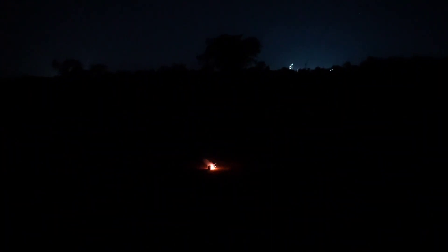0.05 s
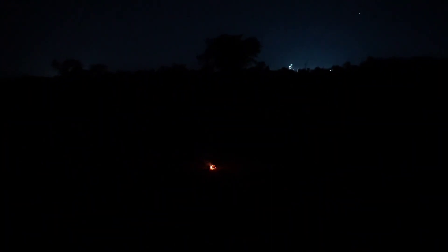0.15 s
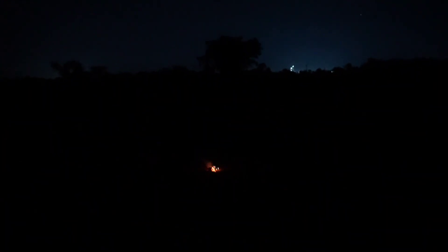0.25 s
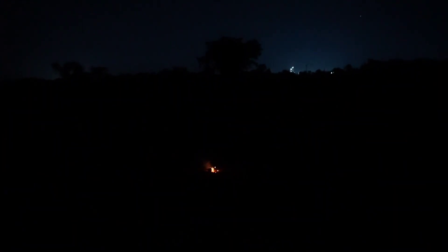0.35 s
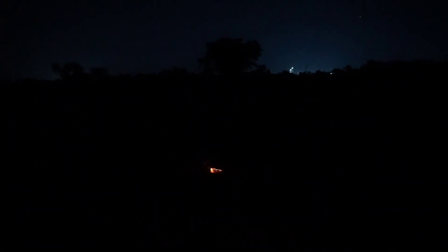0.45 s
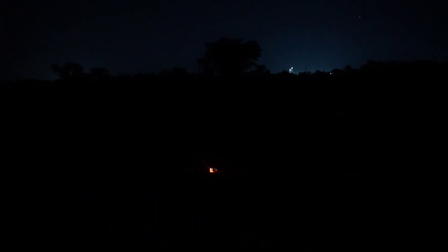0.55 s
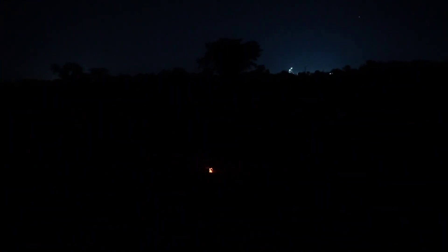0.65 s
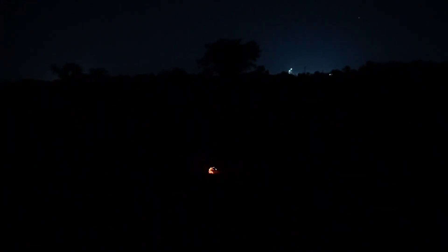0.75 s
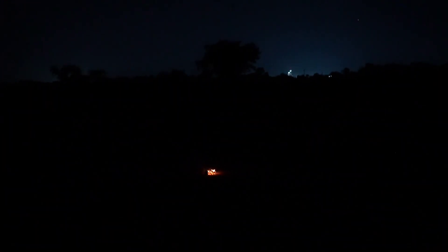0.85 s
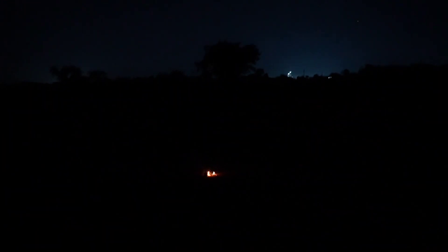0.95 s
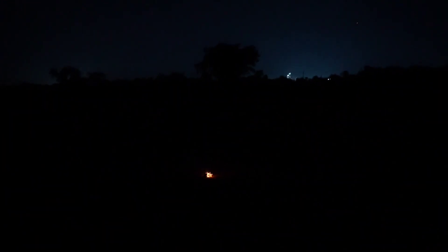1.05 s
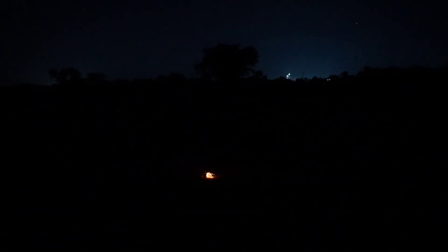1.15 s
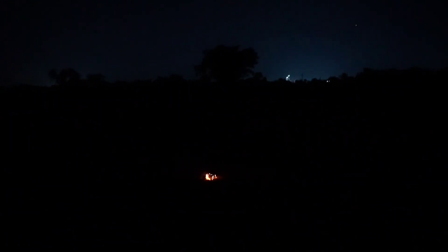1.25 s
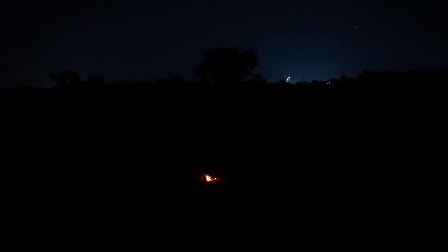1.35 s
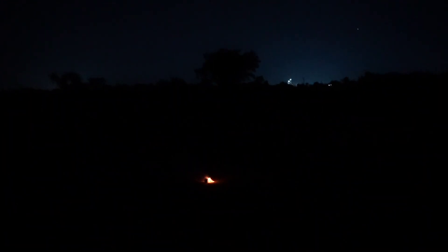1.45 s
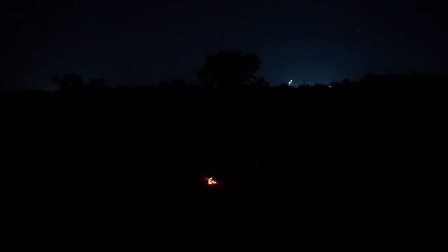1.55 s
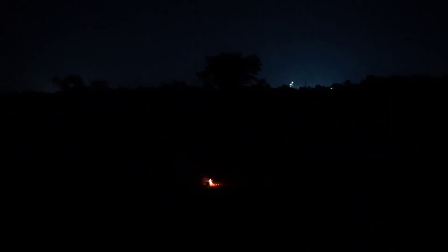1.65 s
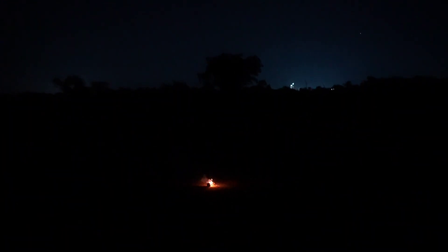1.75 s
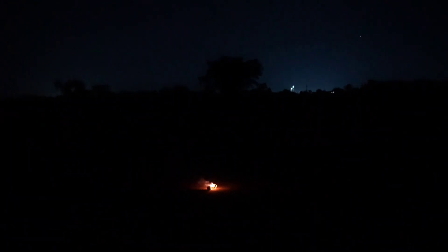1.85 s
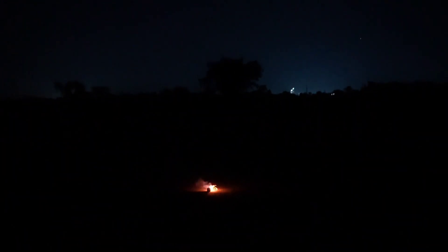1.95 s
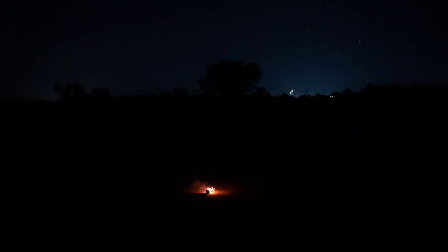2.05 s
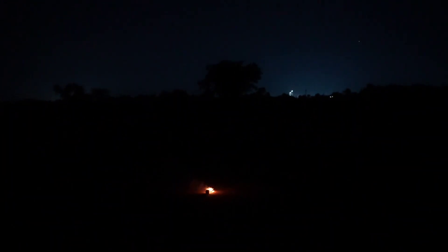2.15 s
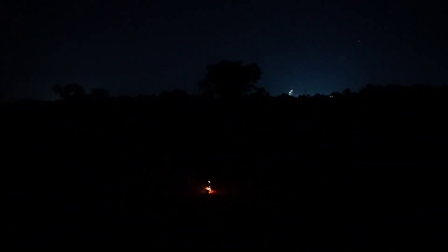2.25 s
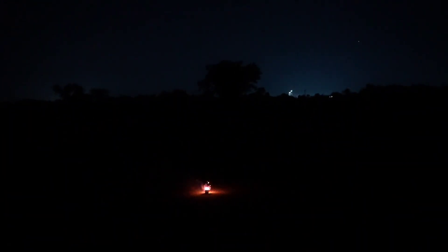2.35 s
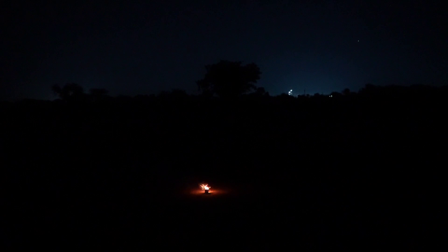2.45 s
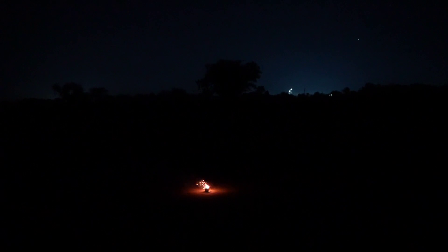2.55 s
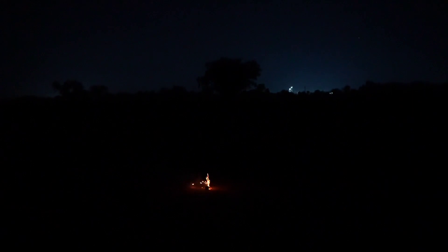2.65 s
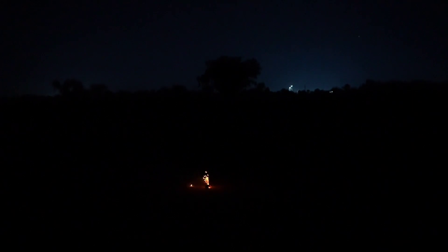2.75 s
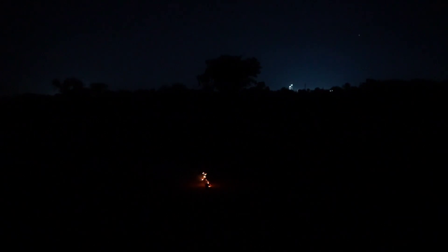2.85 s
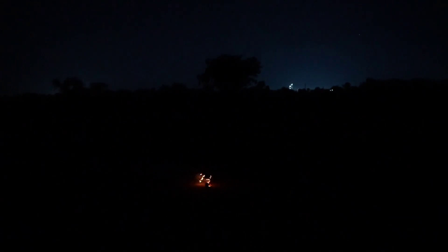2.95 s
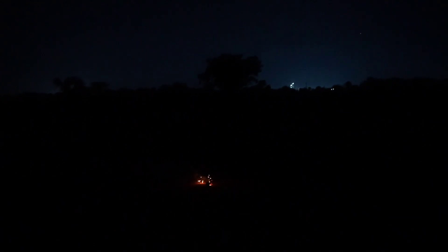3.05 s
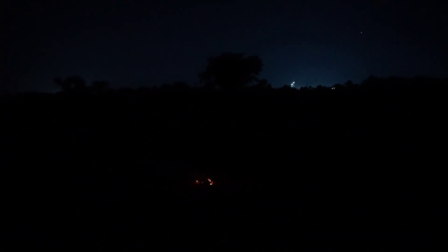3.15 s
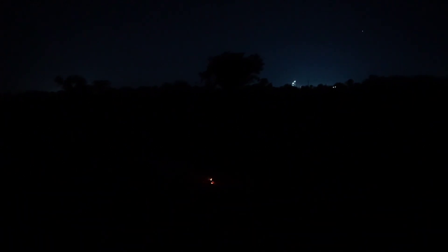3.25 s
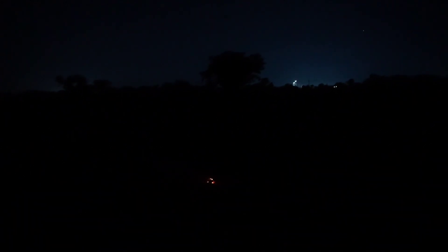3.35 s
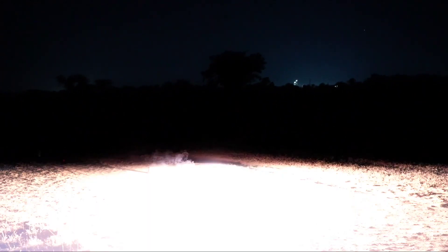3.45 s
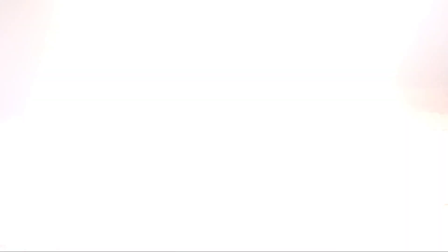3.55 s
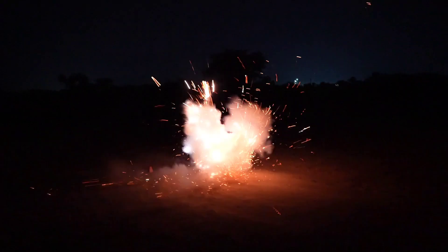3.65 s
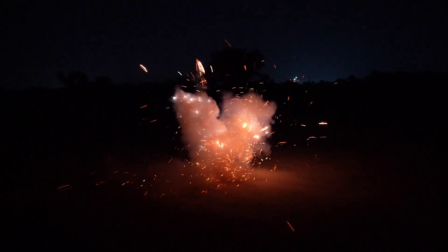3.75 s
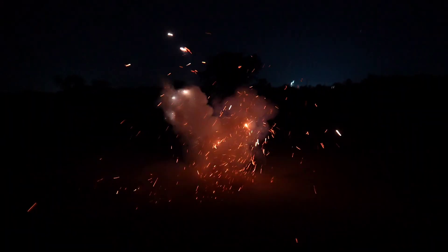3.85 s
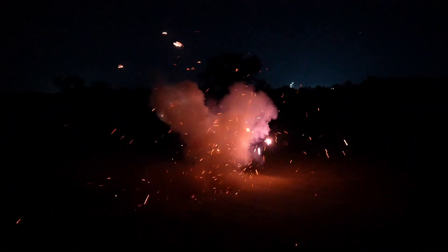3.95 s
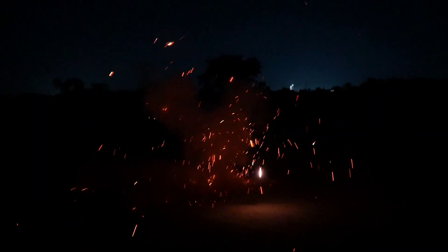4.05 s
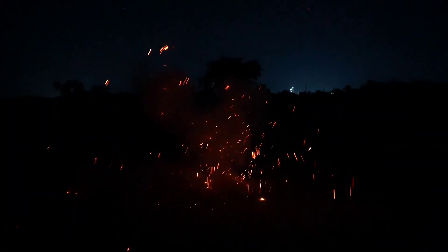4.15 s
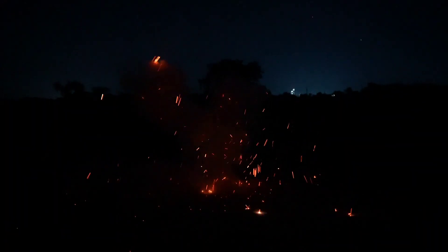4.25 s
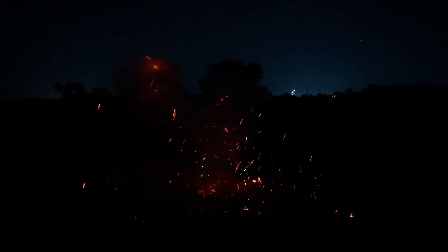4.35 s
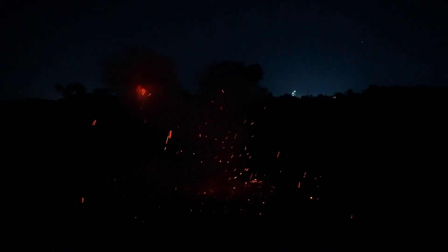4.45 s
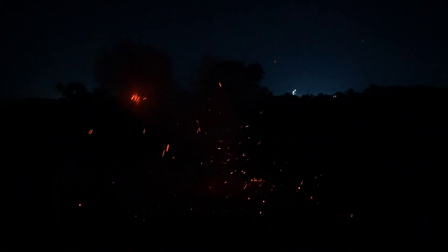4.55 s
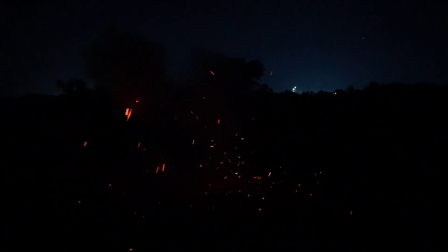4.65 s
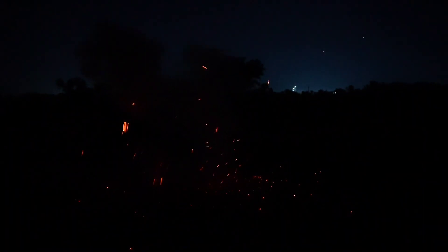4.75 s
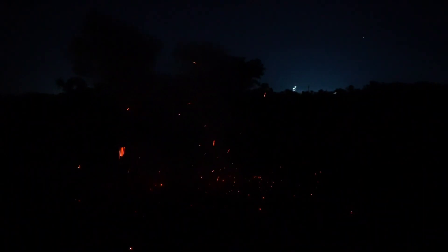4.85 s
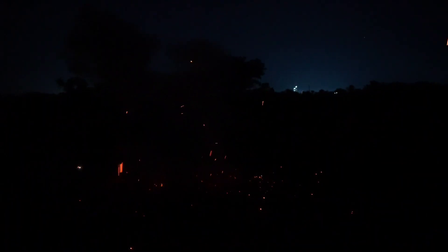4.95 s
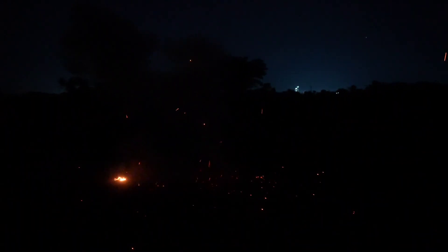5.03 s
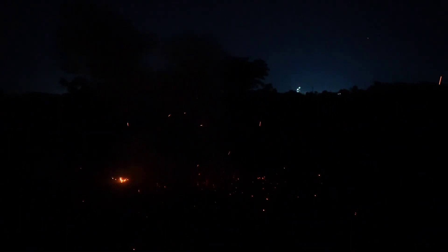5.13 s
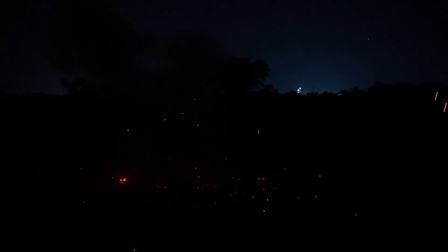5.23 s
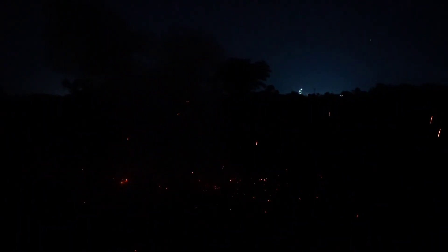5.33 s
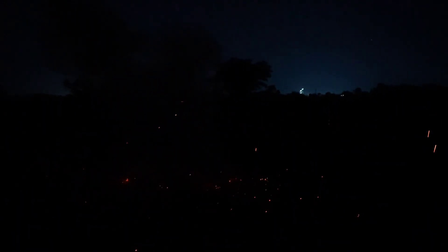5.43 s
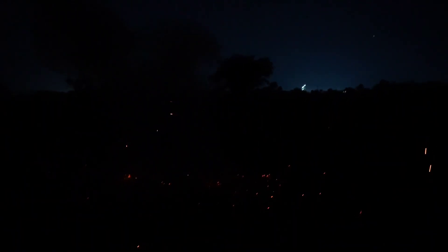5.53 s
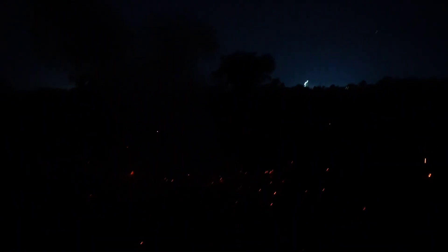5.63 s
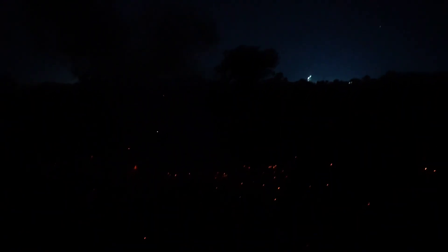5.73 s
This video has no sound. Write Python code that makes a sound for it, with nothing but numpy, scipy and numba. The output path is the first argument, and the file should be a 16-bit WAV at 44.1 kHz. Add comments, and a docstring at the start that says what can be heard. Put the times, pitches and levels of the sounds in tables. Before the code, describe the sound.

After faint sputtering from its fuse, one firecracker blasts outdoors, followed by rolling echoes and a few ticks of falling debris.

```python
"""A big firecracker goes off in an open field at night, near enough to overload the microphone.
Before the blast its fuse fizzes and spits, over soft air, far insects and a distant single-cylinder
diesel whose firings ring its exhaust. Trees and field edges throw the shock back as thumps, rasps
and a darkening rumble. A last wash returns from the far tree line, and bits of the casing tick
on the ground near the microphone."""
import sys
import numpy as np
from scipy import signal
from scipy.fft import rfft, irfft
from scipy.io import wavfile
from scipy.ndimage import uniform_filter1d
from numba import njit

SR = 44100
rng = np.random.default_rng(int(sys.argv[2]) if len(sys.argv) > 2 else 0)


def transcribe(u):
    """Save the signal u as a 16-bit wav file named by the first command-line argument.

    u: samples, shape (n,) or (channels, n), limited to [-1, 1]; the rate is SR.
    q: integer samples, one column per channel.
    """
    v = np.clip(np.atleast_2d(u).T, -1, 1)
    q = np.round(v * 32767).astype(np.int16)
    wavfile.write(sys.argv[1], SR, q)


N = 255466
T = np.arange(N) / SR
BLAST_S, ROLL_S = 3.579, 3.604  # the shock, then its rolling echo, reach the microphone


def undb(db):
    """Decibels to gain."""
    return 10 ** (np.asarray(db) / 20)


def unit(x):
    """Scale to rms 1."""
    return x / np.sqrt(np.mean(x ** 2))


def curves(rows):
    """One value a sample for each column after a table's time column."""
    times, *columns = np.transpose(rows)
    return [np.interp(T, times, column) for column in columns]


def noise():
    """White noise."""
    return rng.standard_normal(N)


def walk(rate):
    """Slow random drift with a spread near 1, turning rate times a second."""
    knots = rng.standard_normal(2000)
    return np.interp(T * rate, np.arange(len(knots)), knots)


def grains(rate, spread_db):
    """Random clicks of uneven size, rms 1."""
    return unit((rng.random(N) < rate / SR) * noise() * undb(spread_db * noise()))


def swell(s, rise_s, decay_s):
    """Envelope that climbs to 1 at time s and dies away."""
    return np.exp(-np.maximum((s - T) / rise_s, (T - s) / decay_s))


def front(s, decay_s):
    """A jump at time s that dies away."""
    return (T > s) * np.exp(-np.maximum(T - s, 0) / decay_s)


def colour(x, outline, size=8192):
    """Causal filter of unit energy: the outline (f/Hz, level/dB) sets only the spectrum's shape."""
    hz, db = np.transpose(outline)
    bins_hz = np.maximum(np.fft.rfftfreq(size, 1 / SR), 1)
    gain = undb(np.interp(np.log(bins_hz), np.log(hz), db))
    cepstrum = irfft(np.log(gain))
    cepstrum[1:size // 2] *= 2  # fold to minimum phase
    cepstrum[size // 2 + 1:] = 0
    response = irfft(np.exp(rfft(cepstrum)))
    return signal.fftconvolve(x, response / np.linalg.norm(response))[:N]


def ring(x, hz, width):
    """Two passes through one resonance, gain 1 at its centre."""
    peak = signal.iirpeak(hz, hz / width, fs=SR)
    return signal.lfilter(*peak, signal.lfilter(*peak, x))


def highpass(x, hz, order=2):
    """Remove what lies below hz."""
    return signal.sosfilt(signal.butter(order, hz, "high", fs=SR, output="sos"), x)


@njit
def lowpass(x, hz):
    """Two-pole low-pass whose edge can move every sample."""
    y, band, low = np.empty(len(x)), 0., 0.
    for i in range(len(x)):
        g = np.tan(np.pi * min(hz[i], .45 * SR) / SR)
        v = (band + g * (x[i] - low)) / (1 + g * (g + 1.15))
        y[i] = low + g * v
        band, low = 2 * v - band, 2 * y[i] - low
    return y


def steady(x, seconds):
    """Bring the running rms to 1, keeping the faster grain."""
    return x / np.sqrt(np.abs(uniform_filter1d(x ** 2, int(seconds * SR))) + 1e-12)


def ticks(rows, outline, decay_s, scatter_db):
    """Tiny snaps: a sharp edge, a short crackle, then a faint scatter from the ground."""
    snaps, t = np.zeros(N), T[:2000]
    envelope = np.exp(-t / decay_s) + undb(scatter_db) * np.exp(-t / .0075)
    for s, db in rows:
        crackle = rng.standard_normal(len(t)) * envelope
        snap = (t == 0) + .8 * crackle / np.linalg.norm(crackle)
        start = int(s * SR)
        snaps[start:start + len(t)] += undb(db) * snap[:N - start]
    return 2.4 * colour(snaps, outline)


# Still air over the field: f/Hz, relative level/dB
AIR_COLOUR = [(20, -16), (32, -10), (60, -0.5), (100, -4.5), (170, -1.5), (300, -10), (420, -15.5),
              (560, -14), (800, -21), (1050, -26), (1900, -32.5), (3100, -31.5), (5000, -37.5),
              (10000, -40), (15000, -47.5)]
# Bands of insects, far from the microphone: f/Hz, width per pass/Hz, full level/dB
INSECT_BANDS = [(2160, 220, -65), (3730, 410, -69.5)]
def night():
    """Soft air all round the microphone; thin bands of far insects waver and slowly swell."""
    air = colour(noise(), AIR_COLOUR) * undb(-43 + .6 * walk(7))
    insects = sum(unit(ring(noise(), hz, width)) * undb(db + 2 * walk(8.3))
                  for hz, width, db in INSECT_BANDS)
    chorus_db = np.interp(T, [0, 2], [-4, 0])
    return air + insects * undb(chorus_db)


# Firing rate of the distant diesel: t/s, f/Hz
FIRING_RATE = [(0, 19.3), (.45, 19.45), (1, 19.96), (1.5, 20.66), (1.96, 21.05), (2.45, 21.9), (2.88, 22.3),
               (3.4, 22.5)]
# Its loudness as the breeze carries it to the microphone: t/s, relative level/dB
DIESEL_LEVEL = [(0, -51.5), (.45, -42.5), (1, -41), (1.5, -38.5), (2.45, -42), (2.88, -38.5), (3.4, -40),
                (5.8, -41)]
# Resonances of its exhaust: f/Hz, nominal width/Hz, relative level/dB
EXHAUST_MODES = [(62.6, 33, -15), (163.3, 71.3, 6.5), (209.4, 21.4, 2), (278, 113, -29), (540, 240, -20)]
def diesel():
    """Far off, each firing rings the exhaust; the field smears a little noise behind it."""
    (rate,), (db,) = curves(FIRING_RATE), curves(DIESEL_LEVEL)
    cycles = np.cumsum(rate) / SR + .82
    firings = np.diff(np.floor(cycles), prepend=0) * undb(1.5 * noise())
    smear = noise() * np.exp(-(cycles % 1))
    push = unit(firings) + undb(-9) * unit(smear)
    pipe = sum(undb(mode_db) * ring(push, hz, .83 * width) for hz, width, mode_db in EXHAUST_MODES)
    return unit(pipe) * undb(db - 1)


# Tone of the hiss at the microphone: f/Hz, relative level/dB
HISS_COLOUR = [(500, -4.5), (1300, 3), (2500, -1.5), (5500, -8), (8200, -2.5), (11500, -9), (13500, -20),
               (16000, -62)]
# Swells of hiss: flares of powder, then, in the last two rows, faint background hiss
# swelling back up as the blast dies away: t/s, relative level/dB, half width/s
HISS_SWELLS = [(.15, -54, 0.091), (.35, -52, 0.096), (.8, -59, 0.063), (1.43, -52, 0.058),
               (1.55, -55.5, 0.034), (1.95, -64, .03), (2.25, -58, 0.038), (3.45, -59.5, 0.043),
               (3.735, -21.5, 0.0097), (4.782, -61, 0.071), (5.78, -60, .17)]
def fizz(sinks_s=1.48, fade_db_per_s=15.5):
    """The fuse fizzes, fading as it burns into the casing; sparks follow the blast; a faint hiss stays."""
    fuse = undb(-57.5 - fade_db_per_s * np.maximum(T - sinks_s, 0)) * (T < BLAST_S)
    sparks = undb(-33.5) * swell(3.765, rise_s=.022, decay_s=.085)
    background = undb(-75) * (T > BLAST_S)
    swells = sum(undb(db) * np.exp(-((T - s) / width) ** 2) for s, db, width in HISS_SWELLS)
    envelope = np.sqrt(fuse ** 2 + (sparks + background) ** 2 + swells ** 2)
    hiss = colour(noise(), HISS_COLOUR) * undb(-1 + .9 * walk(30))
    clicks = colour(grains(rate=420, spread_db=3.3), HISS_COLOUR)
    crackle = highpass(clicks, 6300, order=4) * undb(2.5)
    return (hiss + crackle) * envelope


# Dull pops in the burning fuse: t/s, relative level/dB
FUSE_POPS = [(.128, -31.5), (.849, -34), (1.3265, -30), (2.648, -41), (2.905, -39)]
# Tone of a pop: f/Hz, relative level/dB
DULL_POP = [(400, -20), (1000, 2), (1400, 3), (3000, -4), (5000, -5), (9000, -2), (15000, -22)]
# The loudest sparks spitting from the fuse: t/s, relative level/dB
FUSE_SPITS = [(.4542, -26), (.4888, -29.5), (.5417, -32), (.9708, -26), (1.005, -26.5), (1.0758, -33),
              (1.2698, -33), (1.4207, -30), (1.736, -33.5), (2.659, -31.5), (3.1982, -38.5), (3.255, -44)]
# Tone of a tick near the microphone, spark or bit of casing: f/Hz, relative level/dB
BRIGHT_TICK = [(1500, -45), (4500, -19), (6500, -3.5), (8200, 13), (10000, 7.5), (12800, -1.5), (15500, -8)]
def sputter():
    """The fuse spits bright sparks, with duller pops in its powder."""
    spits = ticks(FUSE_SPITS, BRIGHT_TICK, decay_s=.00052, scatter_db=-32)
    pops = ticks(FUSE_POPS, DULL_POP, decay_s=.00083, scatter_db=-24)
    return spits + pops


def blast(push_s=.002, crack_decay_s=.0014, reflections=9, gap_s=.0024, fade_db_per_s=232):
    """The shock and its weaker returns off nearby ground jump, relax through zero and each crack."""
    fronts = [(BLAST_S, undb(11.5))]
    # the main crack tears in as the push turns to suction
    crack = undb(-2.5) * swell(BLAST_S + push_s, .00057, crack_decay_s) * (T > BLAST_S)
    for k, (jitter, uneven) in enumerate(rng.standard_normal((reflections, 2))):
        lag_s = gap_s * (k + 1 + .26 * jitter)
        size = undb(-1 - fade_db_per_s * lag_s + 3 * uneven)
        fronts.append((BLAST_S + lag_s, -(-1) ** k * size))  # suction and pressure take turns
        crack += size * undb(-21.5) * front(BLAST_S + lag_s, crack_decay_s)
    pressure = sum(size * (1 - (T - s) / push_s) * front(s, push_s) for s, size in fronts)
    rounded = lowpass(highpass(pressure, 43, order=1), np.full(N, 4000.))
    bright_noise = colour(noise(), [(500, -6), (3000, 7), (6000, 12), (11500, 6.5), (16000, -10)])
    return rounded + crack * bright_noise


def thinning(s, knee_s, power):
    """Share that is left of an echo arriving at time s, falling with the length of its path."""
    return (1 + np.maximum(s - ROLL_S, 0) / knee_s) ** -power


def rumble_edge(s):
    """Soft ground swallows what lies above this frequency in an echo arriving at time s."""
    return 794 * thinning(s, knee_s=.068, power=.41)


# Rasp thrown back by foliage: f/Hz, relative level/dB
FOLIAGE_COLOUR = [(300, -16), (800, 4), (1100, 5.5), (1650, -5), (2200, -1.5), (2800, -1.5), (3900, -9),
                  (5000, -7.5), (6300, -8.5), (8000, -7), (12000, -8), (16000, -21)]
# Swells from stands of trees, near to far; thin foliage cuts the rasp's middle:
# t/s, rumble level/dB, rasp level/dB, middle cut/dB, decay/s
TREE_STANDS = [(3.64, -15, -25.5, -3, 0.039), (3.735, -9, -27.5, 9, 0.032), (3.782, -12, -18, 0, 0.01),
               (3.916, -16.5, -23.5, -2, 0.01), (3.98, -17, -50, 4, 0.023),
               (4.031, -22.5, -25.5, 8.5, 0.045), (4.33, -31, -39, -0.5, .025),
               (4.404, -18, -46, -6.5, 0.06), (4.5, -21, -46, -8, 0.026), (4.95, -29, -48.5, -4.5, 0.2),
               (5.12, -34, -49, -1, 0.34), (5.74, -41, -50.5, 1, .3)]
def roll(fade_db_per_s=15.5, split_hz=2050, onset_s=.0016):
    """Countless small reflectors make the rumble, foliage the rasp; both swell at each stand of trees."""
    rumble_power = undb(-13.5 - fade_db_per_s * np.maximum(T - ROLL_S, 0)) ** 2
    treble_power = (undb(-20.5) * thinning(T, knee_s=.16, power=1.745)) ** 2
    middle_power = treble_power.copy()
    for s, rumble_db, rasp_db, cut_db, decay_s in TREE_STANDS:
        shape = swell(s, .44 * decay_s, decay_s)
        rumble_power += (undb(rumble_db) * shape) ** 2
        middle_power += (undb(rasp_db - cut_db) * shape) ** 2
        treble_power += (undb(rasp_db) * shape) ** 2

    rumble = grains(rate=1500, spread_db=3.3)
    for _ in range(3):
        rumble = lowpass(rumble, rumble_edge(T))
    rumble = highpass(highpass(rumble, 130, order=1), 93)
    rumble = steady(rumble, seconds=.052) * np.sqrt(rumble_power)

    grit = unit(noise() + undb(-1) * grains(rate=3000, spread_db=3.8))
    rasp_edge_hz = 6430 * thinning(T, knee_s=1.4, power=.97)  # longer paths come back duller
    foliage = steady(lowpass(colour(grit, FOLIAGE_COLOUR), rasp_edge_hz), seconds=.028)
    middle = signal.sosfiltfilt(signal.butter(3, split_hz, fs=SR, output="sos"), foliage)
    rasp = middle * np.sqrt(middle_power) + (foliage - middle) * np.sqrt(treble_power)
    flutter = undb(3 * walk(70))
    arrived = np.clip((T - ROLL_S) / onset_s, 0, 1)
    return arrived * (rumble + rasp * flutter)


# Echoes off large hard surfaces round the field, near to far:
# t/s, relative thump level/dB, relative slap level/dB
HARD_ECHOES = [(3.6497, -6, -21), (3.697, -5, -9), (3.7145, 0.5, -28), (3.7378, -22, -12),
               (3.7525, -2, -29), (3.7714, -2.5, -29), (3.7928, -8, 0.5), (3.835, -1.5, -17),
               (3.865, -2, -20), (3.884, -5.5, -30), (3.9017, -8.5, -9), (3.9505, -4.5, -7.5),
               (3.9673, -4, -7.5), (3.9856, -3, -12), (4.052, 0, -8), (4.0767, -6, -13),
               (4.1153, -7.5, -13), (4.4, -5.5, -42), (4.473, -30, -28.5), (4.548, -24.5, -34),
               (4.705, -15.5, -31.5), (4.885, -20, -41), (4.955, -22, -44), (5.135, -21, -35),
               (5.298, -23, -39)]
# Tone of a slap back at the microphone: f/Hz, relative level/dB
SLAP_TONE = [(300, -8), (700, 10.5), (1050, 5), (1650, -5), (2700, -2.5), (5000, -10), (8000, -13),
             (14000, -46)]
def echoes(thump_lag_s=.0011, width_cycles=.58):
    """Large reflectors each return a sharp slap and a thump, deeper the later it comes."""
    thumps = np.zeros(N)
    for s, db, _ in HARD_ECHOES:
        window = np.abs(T - s) < .06
        thump_hz = .53 * rumble_edge(s)
        cycles = thump_hz * (T[window] - s - thump_lag_s)
        # ground and air round the shock into one swing of pressure
        thumps[window] += undb(db) * np.sin(2 * np.pi * cycles) * np.exp(-(cycles / width_cycles) ** 2)
    slaps = [(s, db) for s, _, db in HARD_ECHOES]
    return thumps + ticks(slaps, SLAP_TONE, decay_s=.0033, scatter_db=-22)


# Roar from the far tree line: f/Hz, relative level/dB
ROAR_COLOUR = [(200, 9.5), (450, 2.5), (850, 6), (1200, -3.5), (1600, -14.5), (2800, -14.5), (4500, -27),
               (9000, -36)]
# Crests in that roar: t/s, level above it/dB
ROAR_CRESTS = [(5.13, 3), (5.5, 10)]
def far_wash(full_s=4.98, rise_s=.21):
    """The far tree line returns a soft roar that rises, holds and crests twice."""
    rise = np.exp(np.minimum(T - full_s, 0) / rise_s)
    crest_db = sum(db * swell(s, rise_s=.016, decay_s=.075) for s, db in ROAR_CRESTS)
    flutter = undb(1.6 * walk(35))
    return colour(noise(), ROAR_COLOUR) * undb(-42.5 + crest_db) * rise * flutter


# Bits of casing landing near the microphone: t/s, relative level/dB
CASING_BITS = [(4.532, -35), (4.664, -40.5), (5.0304, -18), (5.0405, -5.5), (5.0427, -16), (5.087, -37),
               (5.3545, -43), (5.731, -39)]
def debris():
    """Falling bits of casing tick on the ground."""
    return ticks(CASING_BITS, BRIGHT_TICK, decay_s=.00059, scatter_db=-25)


def scene():
    """Near and far, everything meets at one microphone in the open field."""
    bang = blast() + roll() + echoes() + far_wash()
    return (diesel() + night() + fizz() + sputter() + bang + debris())[None]


def record(dry, ceiling=.76, top_hz=15400):
    """The microphone saturates on the blast; the highest treble is cut."""
    saturated = dry / (1 + (dry / ceiling) ** 6) ** (1 / 6)
    return signal.sosfilt(signal.ellip(10, .2, 105, top_hz, fs=SR, output="sos"), saturated)


dry = scene()
out = record(dry)
transcribe(out)
```